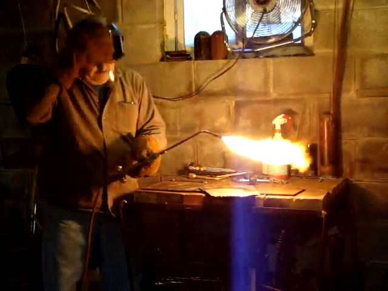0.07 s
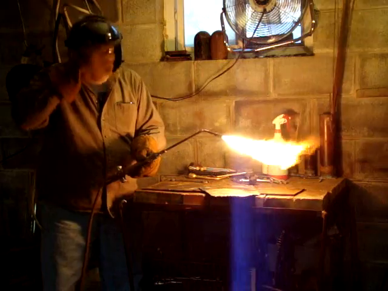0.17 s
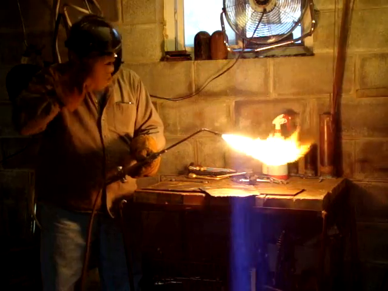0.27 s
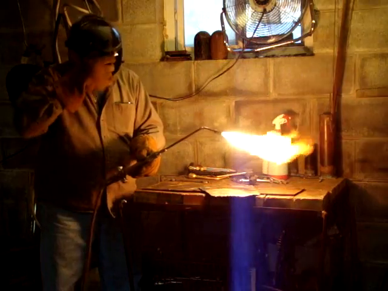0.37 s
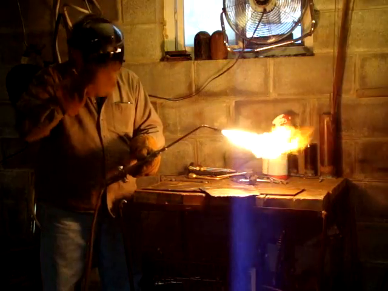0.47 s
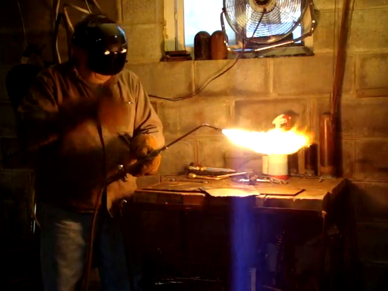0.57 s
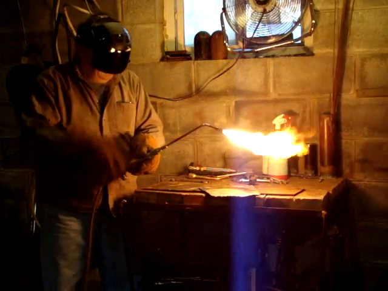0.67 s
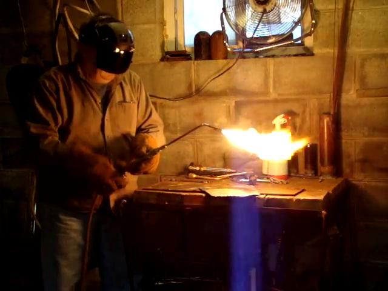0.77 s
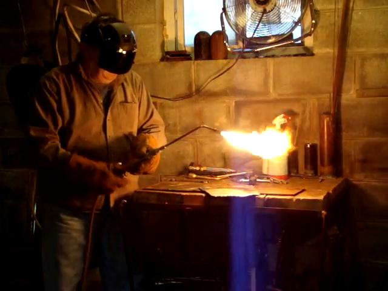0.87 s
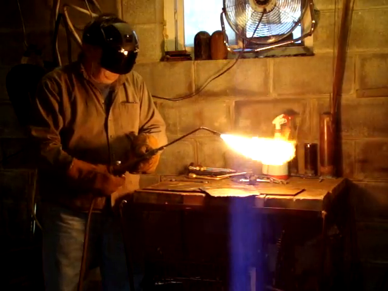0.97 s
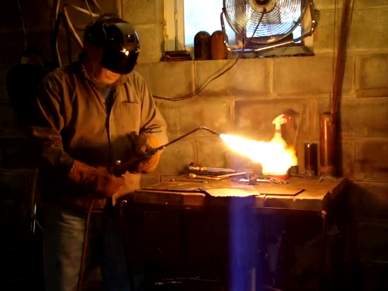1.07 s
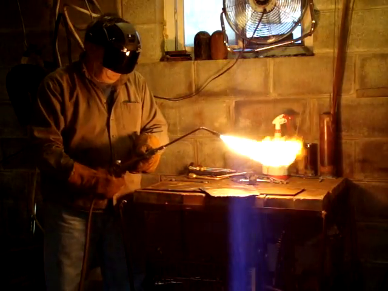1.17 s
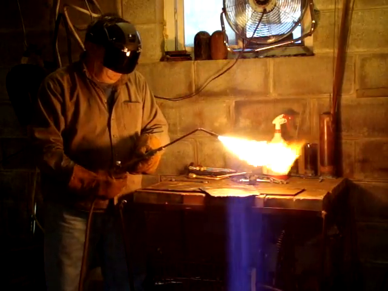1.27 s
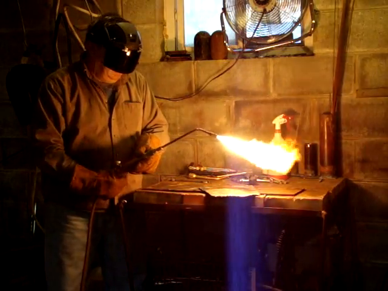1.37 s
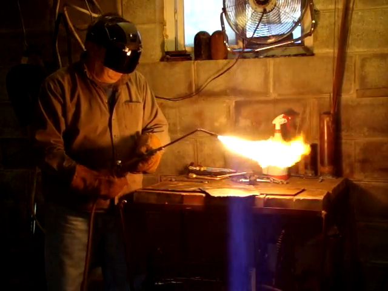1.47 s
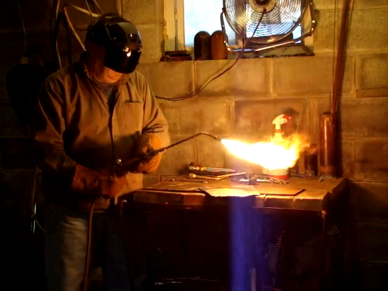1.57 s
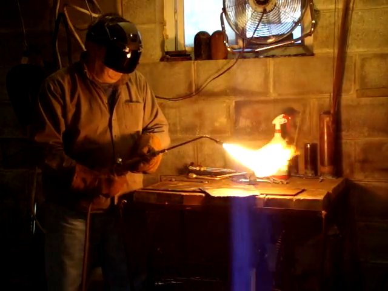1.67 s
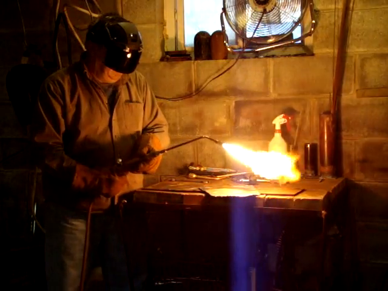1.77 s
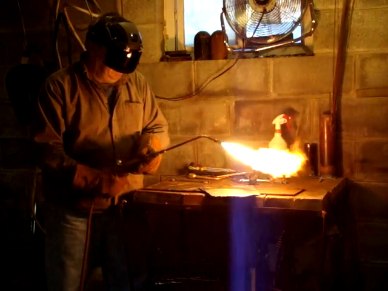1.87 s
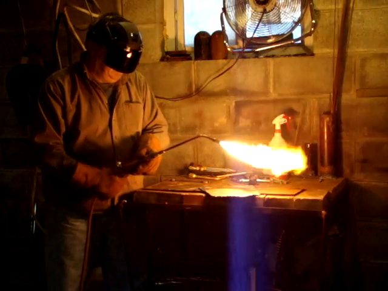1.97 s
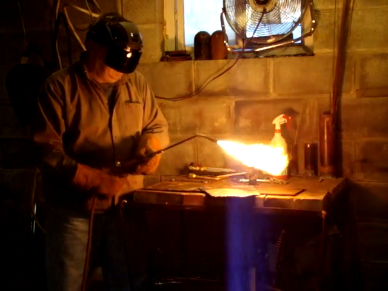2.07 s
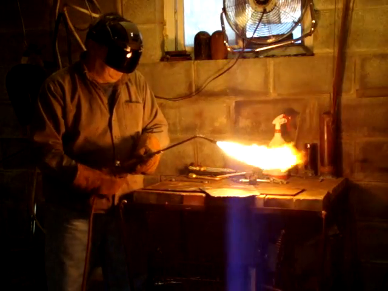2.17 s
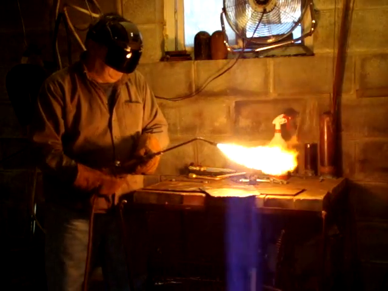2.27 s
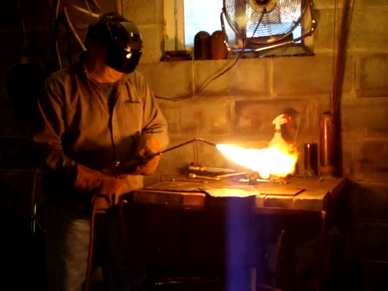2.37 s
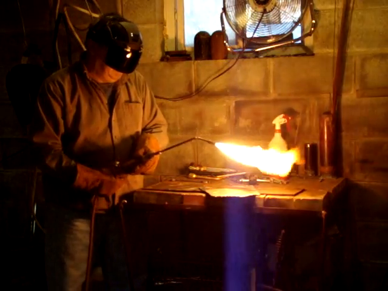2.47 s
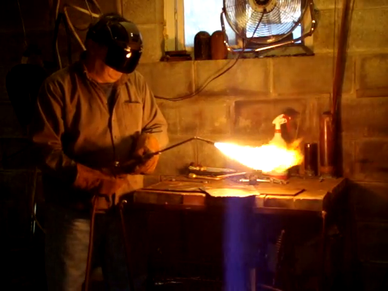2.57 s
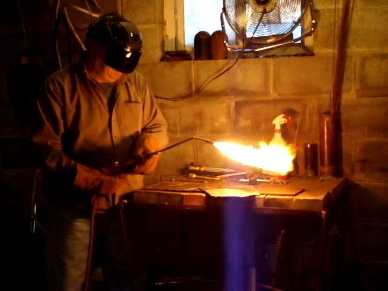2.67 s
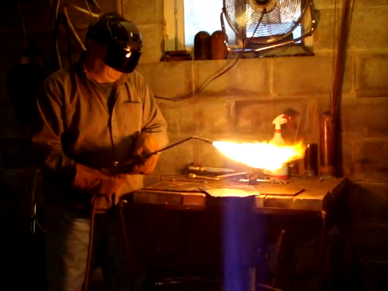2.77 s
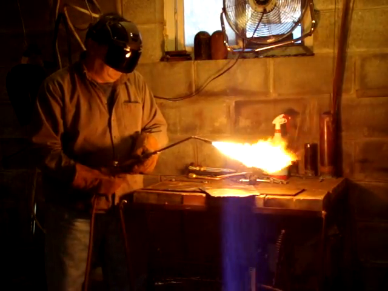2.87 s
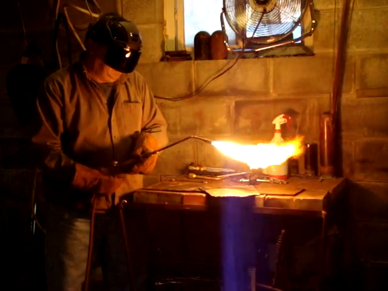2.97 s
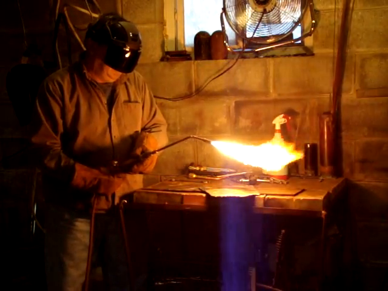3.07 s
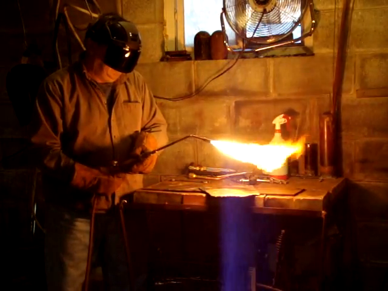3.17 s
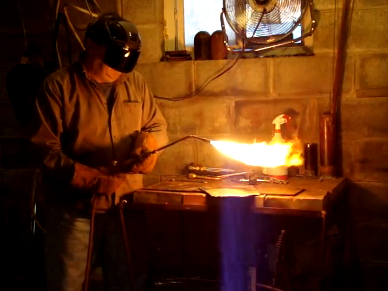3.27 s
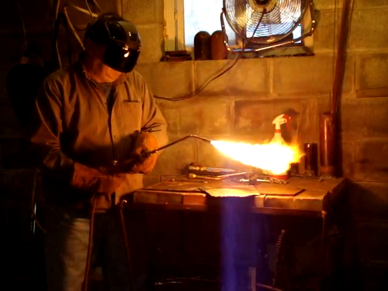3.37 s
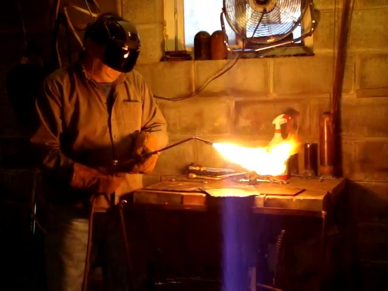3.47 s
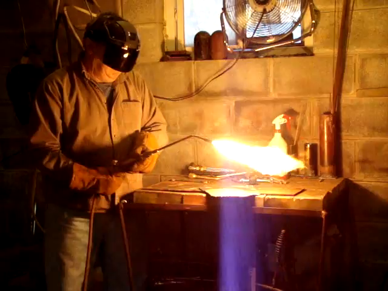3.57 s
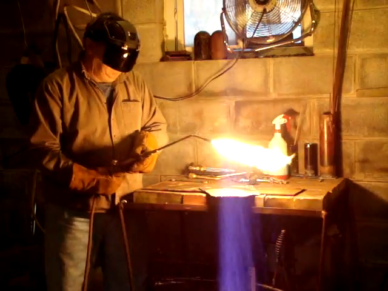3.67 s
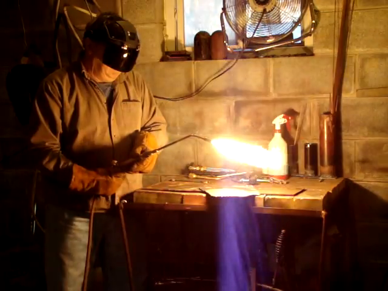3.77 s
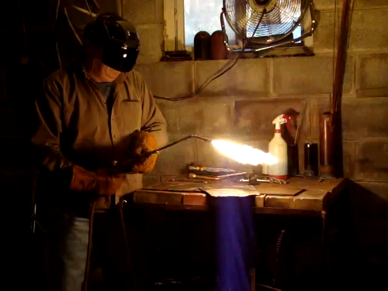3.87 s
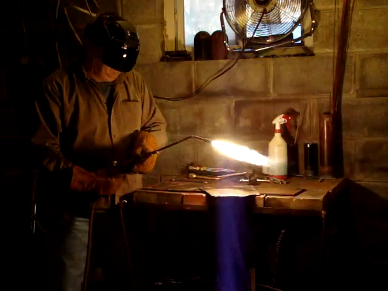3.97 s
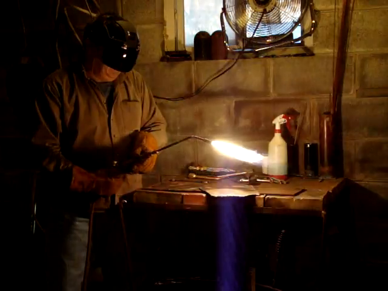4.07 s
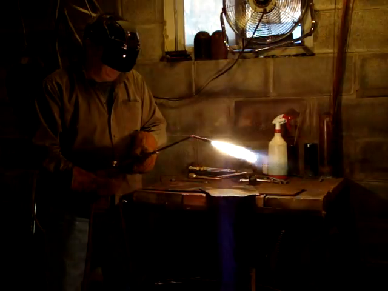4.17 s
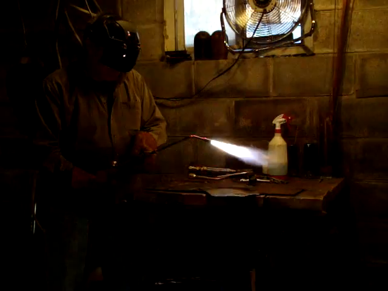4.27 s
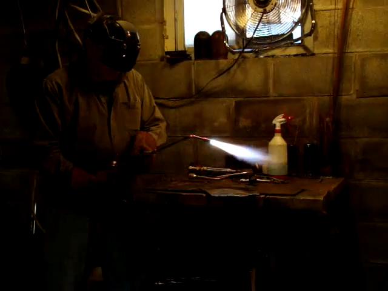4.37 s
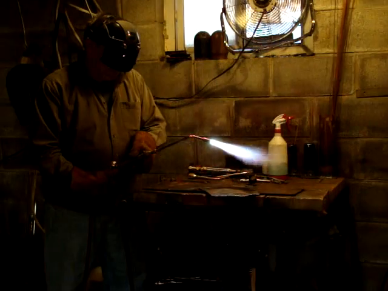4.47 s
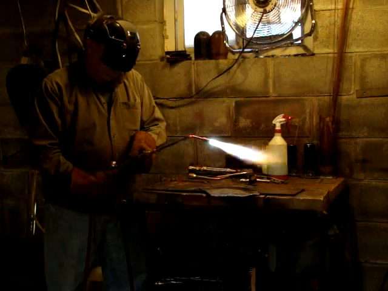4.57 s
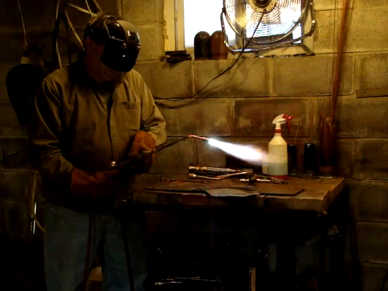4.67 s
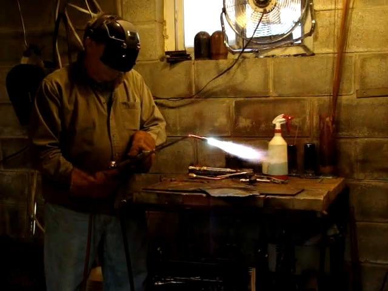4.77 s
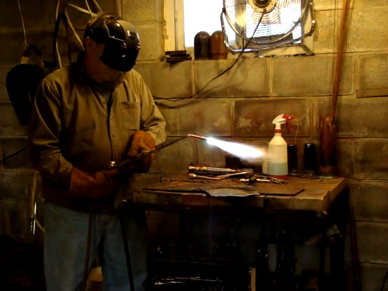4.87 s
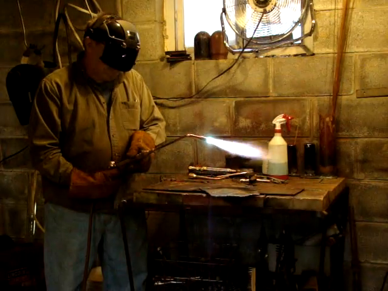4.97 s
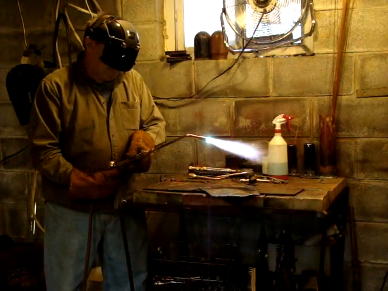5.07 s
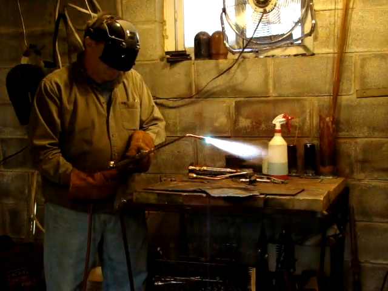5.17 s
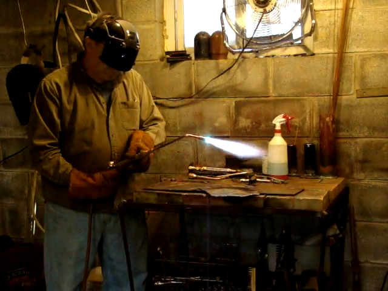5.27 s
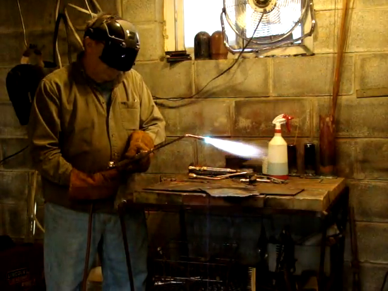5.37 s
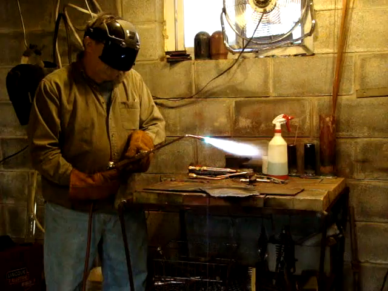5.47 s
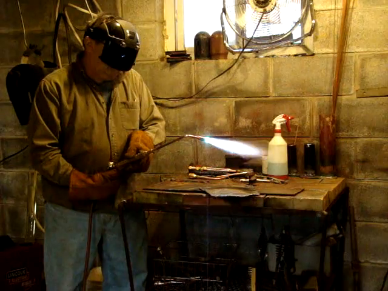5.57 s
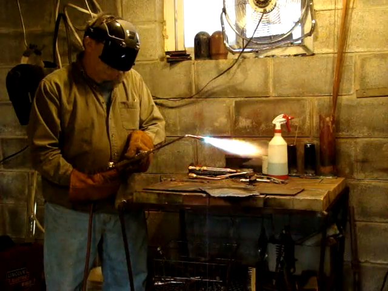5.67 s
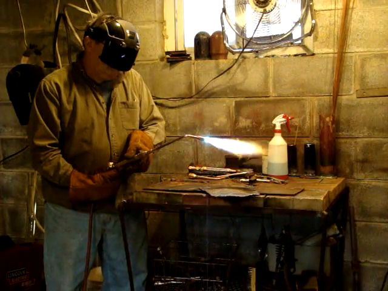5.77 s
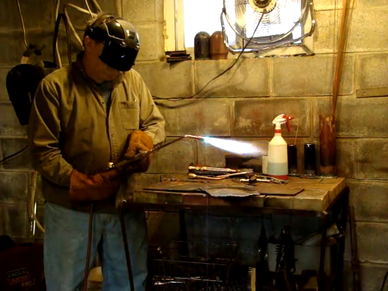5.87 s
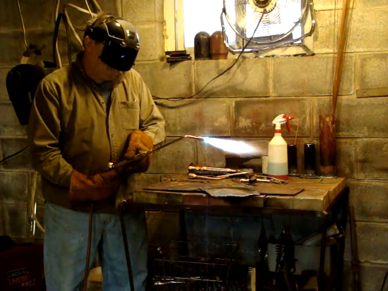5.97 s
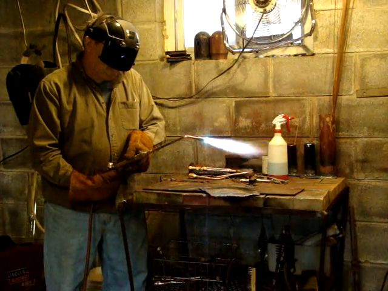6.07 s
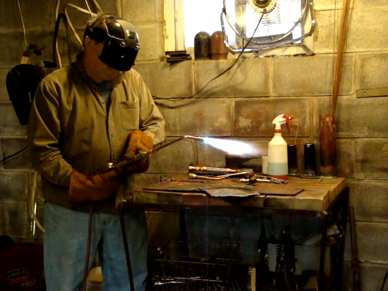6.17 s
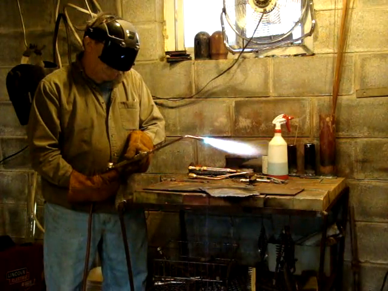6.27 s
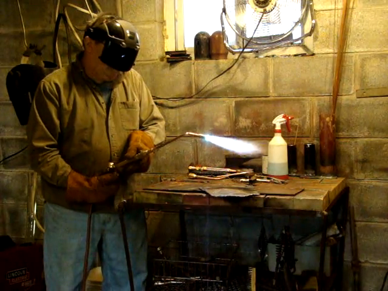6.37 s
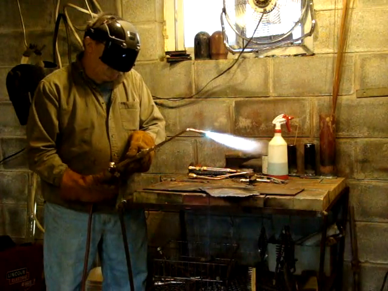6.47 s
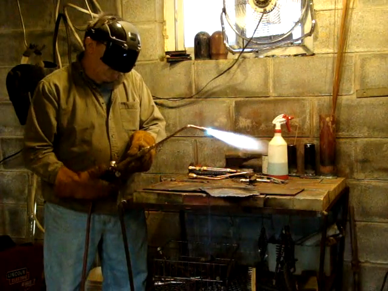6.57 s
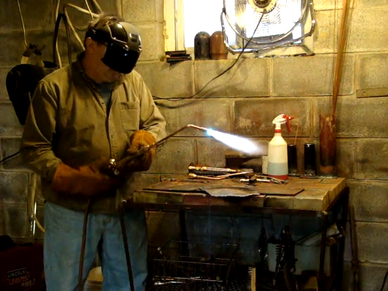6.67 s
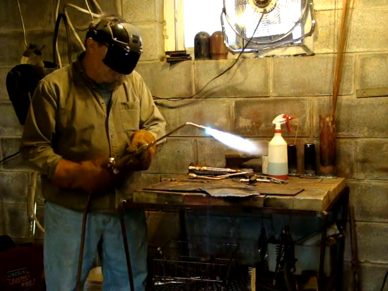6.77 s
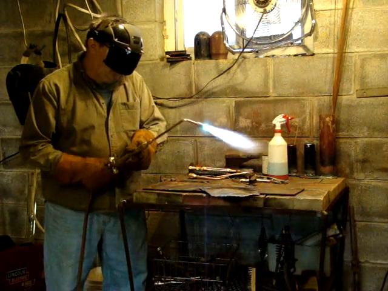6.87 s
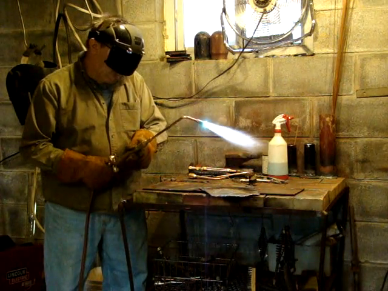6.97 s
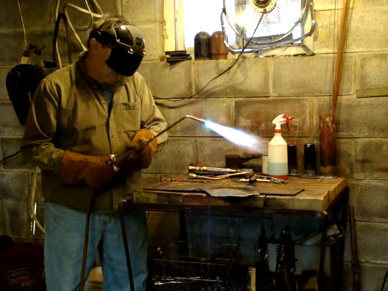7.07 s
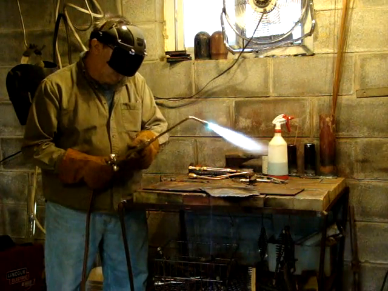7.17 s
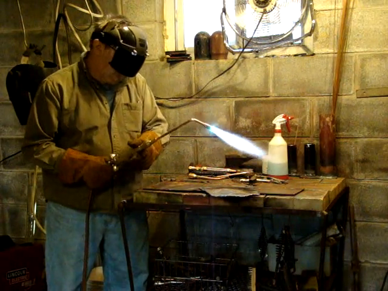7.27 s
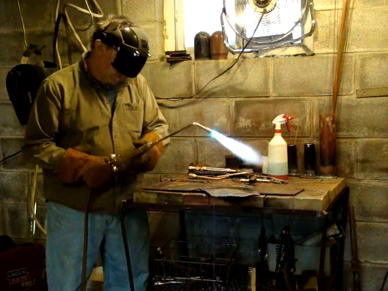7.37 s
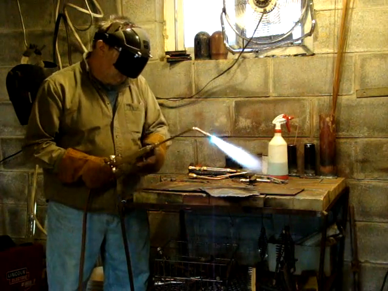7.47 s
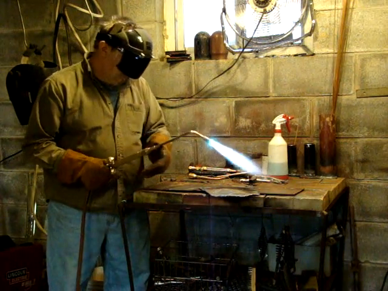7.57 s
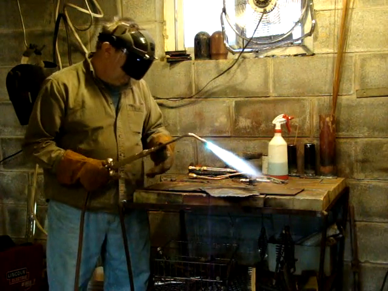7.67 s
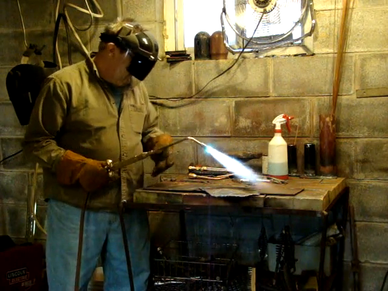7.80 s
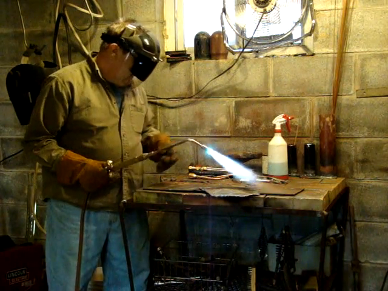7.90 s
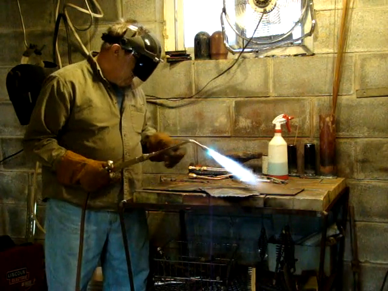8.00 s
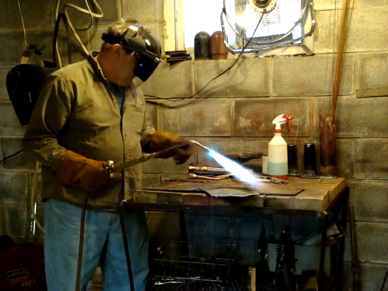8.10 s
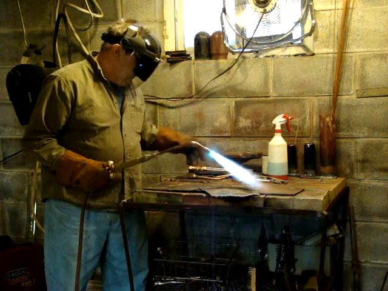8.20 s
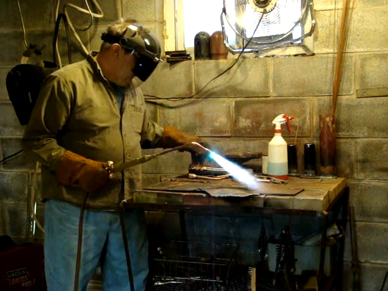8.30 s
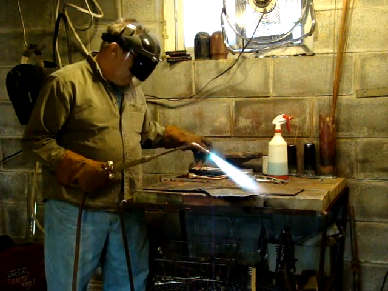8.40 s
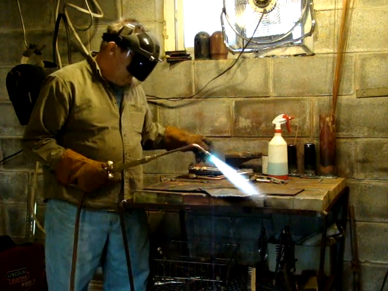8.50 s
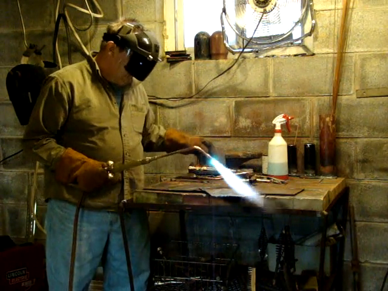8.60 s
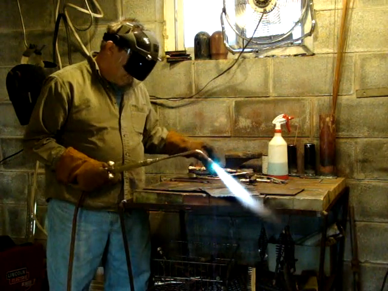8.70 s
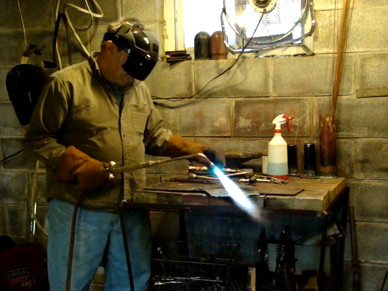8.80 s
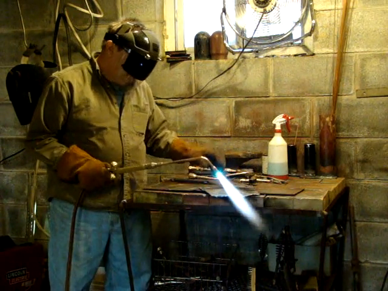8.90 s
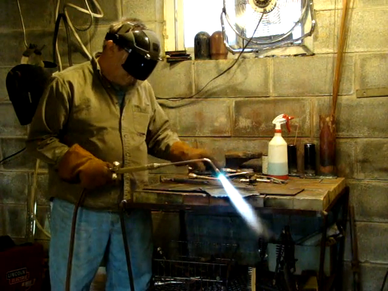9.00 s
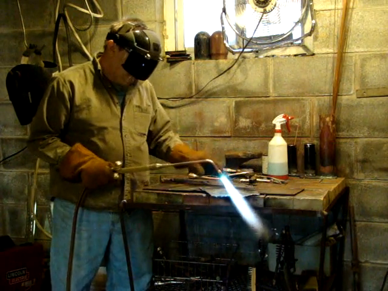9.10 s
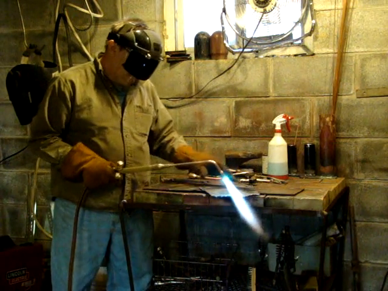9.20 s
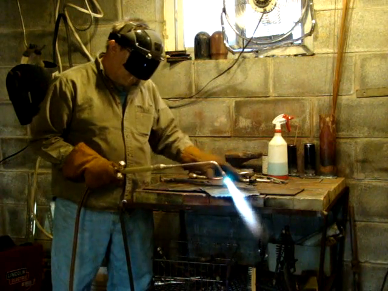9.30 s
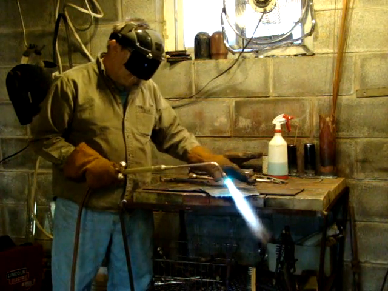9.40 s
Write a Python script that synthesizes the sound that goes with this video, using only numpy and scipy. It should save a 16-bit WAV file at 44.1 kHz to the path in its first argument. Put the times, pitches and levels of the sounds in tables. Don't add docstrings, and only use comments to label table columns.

```python
import sys
import numpy as np
from scipy import signal
from scipy.io import wavfile
from scipy.ndimage import uniform_filter1d

SR = 44100
rng = np.random.default_rng(int(sys.argv[2]) if len(sys.argv) > 2 else 0)


def wrap_up_sound(samples):
    columns = np.atleast_2d(samples).T
    tamed = np.clip(columns, -1, 1)
    steps = np.round(tamed * 32767).astype(np.int16)
    wavfile.write(sys.argv[1], SR, steps)


def invert_db(level):
    return 10 ** (np.asarray(level, dtype=float) / 20)


N = 416304
FRAME, HOP = 2048, 512
HZ = np.fft.rfftfreq(FRAME, 1 / SR)[:, None]
TIMES = (np.arange(N // HOP + 5) * HOP) / SR
BLUE_S = 4.22


def valve():
    # time_s, oxygen_share (0-1), whoosh_db
    opening = [
        (3.55, 0.05, -42),
        (3.76, 0.22, -22.5),
        (3.9, 0.27, -16),
        (3.98, 0.49, -13),
        (4.12, .83, -14.5),
        (4.25, 0.9, -16.5),
        (4.55, 0.95, -23.5),
        (5.25, 0.98, -29),
        (5.65, 1, -46),
    ]
    time_s, share, whoosh_db = np.transpose(opening)
    oxygen = np.clip(np.interp(TIMES, time_s, share), 0, 1)
    return oxygen, np.interp(TIMES, time_s, whoosh_db)


def sooty_roar(oxygen):
    # pitch_hz, level_db (per Hz)
    spectrum = [(100, -15.5), (200, -2.5), (300, -0.5), (450, -1), (800, -1), (1200, -2), (1700, -2.5),
                (2700, -4), (3700, -3.5), (4800, -5), (6800, -9.5), (9600, -11.5), (11000, -17.5)]
    flare_db = 3.5 * np.minimum(oxygen / 0.28, 1)
    soot = (1 - oxygen ** 3) ** 1.59 + invert_db(-26) * oxygen
    return invert_db(-21.2 + flare_db) * soot * shape(spectrum)


def whoosh(oxygen, level_db, low_hz=890, high_hz=6460, below=0.65, above=0.87):
    centre_hz = low_hz * (high_hz / low_hz) ** oxygen
    spread = 1 + 0.74 * (1 - oxygen)
    octaves = np.log2((HZ + 1) / centre_hz) / spread
    width = np.where(octaves < 0, below, above)
    hump = np.exp(-.5 * (octaves / width) ** 2)
    return invert_db(level_db) * hump / np.sqrt(np.mean(hump ** 2, axis=0))


def swing_db(time_s=8.78, width_s=0.074, peak_db=1.5):
    return peak_db * np.exp(-.5 * ((TIMES - time_s) / width_s) ** 2)


def blue_rush(settle_s=0.98):
    # pitch_hz, level_db (per Hz)
    spectrum = [(100, -16.5), (210, -11), (300, -4), (420, -5), (600, -0.5), (850, -1), (1200, -2),
                (2000, -3.5), (3400, -5), (6000, -6.5), (11000, -15)]
    since = np.maximum(TIMES - BLUE_S, 0)
    level_db = -29.5 - 12.5 * np.exp(-since / settle_s) + swing_db()
    return invert_db(level_db) * shape(spectrum)


def jet_hiss(oxygen, surge_s=3.1):
    # pitch_hz, level_db (per Hz)
    spectrum = [(1000, -20.5), (2400, -33.5), (3400, -10.5), (4800, 0), (6800, 3.5), (9600, 10.5),
                (11000, -7)]
    since = np.maximum(TIMES - BLUE_S, 0)
    shut = 1 - np.minimum(oxygen / 0.32, 1)
    level_db = -24 - 14.5 * shut + np.exp(-since / surge_s) + swing_db()
    return invert_db(level_db) * shape(spectrum)


def flame(glint_db=1.62, flicker_db=1.04, gust_db=0.28):
    oxygen, whoosh_db = valve()
    power = sooty_roar(oxygen) ** 2 + whoosh(oxygen, whoosh_db) ** 2
    power += blue_rush() ** 2 + jet_hiss(oxygen) ** 2
    flicker = patches(bins=150, frames=1)
    glints = patches(bins=3, frames=30) * np.clip(HZ / 5000, 0, 1)
    gusts = patches(bins=20, frames=5)
    return np.sqrt(power) * invert_db(glint_db * glints + flicker_db * flicker + gust_db * gusts)


def evened(x):
    return x / np.sqrt(np.mean(np.abs(x) ** 2) + 1e-20)


def shape(points):
    f, db = np.transpose(points)
    return evened(invert_db(np.interp(np.log(HZ + 1), np.log(f), db, left=-90)))


def patches(bins, frames):
    field = rng.standard_normal((len(TIMES), len(HZ))).T
    for _ in range(2):
        field = uniform_filter1d(field, bins, 0)
        field = uniform_filter1d(field, frames, 1)
    return evened(field)


def noise(gain):
    a, b = rng.standard_normal((len(TIMES), len(HZ), 2)).T
    waves = (a + 1j * b) * gain
    return signal.istft(waves, nperseg=FRAME, noverlap=FRAME - HOP)[1][:N] / 27


def workshop(x, depth=1.1):
    # start_s, end_s
    moves = [
        (1.9, 2.7),
        (4.2, 4.7),
        (7.5, 7.95),
    ]
    # pitch_hz, width_hz, level_db
    level_pose = [(597, 70, 4.6), (808, 51, -3.2), (1375, 44, -3.3), (1690, 38, 4.8), (1883, 39, -2.9),
                  (2246, 45, -4.4), (2332, 38, 2.9), (2598, 50, 4), (2657, 31, -5.2), (2772, 35, 3.1),
                  (2943, 34, 3.6), (3014, 90, -2.8), (3306, 70, 2.9), (3500, 38, 3)]
    # pitch_hz, width_hz, level_db
    leaning_pose = [(582, 68, 3.4), (796, 30, -3), (1790, 42, 2.3), (2141, 87, -5.7), (2658, 31, -3.9),
                    (2784, 71, 4.7), (3040, 70, -4.5), (3502, 38, 4.8), (3586, 49, -5.5), (3729, 50, 3.6),
                    (4437, 63, 3.7), (4590, 89, -4.3), (4996, 127, 2.5), (6526, 34, 4.3)]
    # pitch_hz, width_hz, level_db
    raised_pose = [(381, 50, -4), (558, 41, 3.6), (606, 35, -2.3), (760, 25, 2.8), (850, 28, 2.4),
                   (2190, 255, -1.5), (2896, 41, -3.5), (3066, 90, -2.7), (3396, 45, 2.6), (3649, 38, -3.1),
                   (5230, 97, 2.2), (5399, 90, -2.8), (5552, 56, 3.5), (7358, 66, 3.7)]
    # pitch_hz, width_hz, level_db
    tipped_pose = [(376, 90, -4), (447, 37, 5), (551, 31, 2.7), (605, 44, -3), (838, 52, 5),
                   (1270, 75, -2.5), (1490, 55, 2.5), (3108, 79, 2.5), (2650, 31, -3.3), (2783, 36, 2.9),
                   (2928, 46, -3.8), (3245, 30, -3.6), (3418, 66, -2.8), (4975, 65, 2.9)]
    # pitch_hz, width_hz, level_db
    block_walls = [(312, 55, 2.9), (480, 65, -3.5), (905, 31, 3.8), (941, 25, -4), (982, 32, 3.4),
                   (1027, 31, -3.4), (1195, 40, 2.5), (1256, 58, -4), (1450, 87, 5.4), (1600, 75, -6.2),
                   (1794, 40, 3.8), (1980, 52, 5), (2457, 42, 3.2), (3126, 40, 2)]

    hz, t, z = signal.stft(x, SR, nperseg=4096, noverlap=3072)

    def curve(table):
        return sum(db * np.exp(-(2 * (hz[:, None] - f) / width) ** 2 * np.log(2)) for f, width, db in table)

    poses = [curve(table) for table in (level_pose, leaning_pose, raised_pose, tipped_pose)]
    comb_db = poses[0]
    for move, before, after in zip(moves, poses, poses[1:]):
        comb_db = comb_db + np.interp(t, move, [0, 1]) * (after - before)
    wall_share = np.interp(t, moves[-1], [1, 0.31])
    comb_db = comb_db + curve(block_walls) * wall_share
    return signal.istft(z * invert_db(depth * comb_db), SR, nperseg=4096, noverlap=3072)[1][:N]


def reverberate(x, wet_db=-4.5, t60=.3, treble_hz=9000, bass_hz=1600, count=6):
    t = np.arange(SR // 2) / SR
    place = np.arange(N) / N * (count - 1)
    out = x.copy()
    for k in range(count):
        tail = rng.standard_normal(len(t)) * invert_db(-60 * t / t60) * (t > .012)
        tail = signal.lfilter([1], [1, -np.exp(-2 * np.pi * treble_hz / SR)], tail)
        tail = signal.lfilter(*signal.butter(1, bass_hz, "high", fs=SR), tail)
        share = np.cos(np.pi / 2 * np.clip(place - k, -1, 1))
        out += invert_db(wet_db) * signal.oaconvolve(x * share, tail / np.linalg.norm(tail))[:N]
    return out / np.hypot(1, invert_db(wet_db))


def microphone():
    # pitch_hz, level_db
    response = [(125, -51), (148, -23.5), (175, -5), (225, -9.5), (245, 1), (11000, 0)]
    return shape(response)


def scene():
    torch = noise(flame() * microphone())
    return np.tile(reverberate(workshop(torch)), (2, 1))


def treble_holes(x, depth_db=-20, rarity=1.75, full_hz=9500):
    hz, t, z = signal.stft(x, SR, nperseg=256, noverlap=192)
    field = rng.standard_normal(z.shape[::-1]).T
    field = evened(signal.fftconvolve(field, np.outer(np.hanning(8), np.hanning(13)), "same"))
    edge = rarity + .9 * np.maximum(np.log2(full_hz / (hz + 1)), 0)
    hole = 1 / (1 + np.exp(-8 * (field - edge[:, None])))
    return signal.istft(z * invert_db(depth_db * hole), SR, nperseg=256, noverlap=192)[1][:N]


def bass_blips(x, under_db=-35):
    busy = [4.02, 5.0, 5.15, 5.55, 6.42, 6.52, 7.42, 7.95, 8.85]
    size, hop = 4096, 2048
    frames = N // hop
    low = signal.lfilter(*signal.butter(2, [300, 1000], "band", fs=SR), x)[:frames * hop]
    low_db = 10 * np.log10(np.mean(low.reshape(frames, -1) ** 2, axis=1) + 1e-12)
    chance = np.interp(low_db, [-36, -29], [.075, .4])
    chance[np.round(np.array(busy) * SR / hop).astype(int) - 1] = 0.67
    draws = rng.random((frames, 11, 2))
    t, out = np.arange(size) / SR, np.zeros(N + size)
    fade = np.sin(np.pi * t * SR / size) ** 2
    for frame, line in zip(*np.nonzero(draws[..., 0] < chance[:, None])):
        pitch_hz = (line + 2.5) * SR / size
        tone = np.cos(2 * np.pi * (pitch_hz * t + draws[frame, line, 1]))
        out[frame * hop:][:size] += invert_db(low_db[frame] + under_db) * fade * tone
    return out[:N]


def side_bursts(mid):
    # time_s, low_hz, high_hz, level_db (side against middle)
    splits = [(0.423, 6190, 7650.0, -6), (0.515, 5100, 6360.0, -5.7), (0.517, 6820.0, 8340.0, -7.1),
              (2.512, 5200, 6430, -7), (3.394, 5610.0, 7570, -5.6), (3.674, 4580.0, 5760.0, -9.1),
              (4.603, 7530, 8940, -4), (5.438, 4150.0, 5240.0, -8.1), (6.715, 5200, 6360.0, -10),
              (7.505, 8110.0, 9800, -8.1), (8.456, 5200, 6300, -5)]
    side, size = np.zeros(N), 2048
    for s, low_hz, high_hz, db in splits:
        at = round(s * SR) - size // 2
        band = signal.firwin(601, [low_hz, high_hz], pass_zero=False, window=("kaiser", 7), fs=SR)
        heard = np.convolve(mid[at:at + size], band, "same")
        burst = rng.standard_normal(size) * np.pad(signal.windows.tukey(size - 400, .5), 200)
        fill = np.convolve(burst, band, "same")
        side[at:at + size] += invert_db(db) * np.std(heard) * evened(fill)
    return side


def top_cut(x):
    return signal.sosfilt(signal.butter(12, 11310, fs=SR, output="sos"), x)


def record(dry):
    straight = np.clip(dry[0], -.6, .6)
    mid = straight + .19 * np.tanh((dry[0] - straight) / .19)
    mid = treble_holes(mid) + bass_blips(mid)
    mid = signal.oaconvolve(mid, signal.firwin(2001, 10110, window=("kaiser", 10), fs=SR), "same")
    side = side_bursts(mid)
    return top_cut(np.array([mid + side, mid - side]))


dry = scene()
out = record(dry)
wrap_up_sound(out)
```